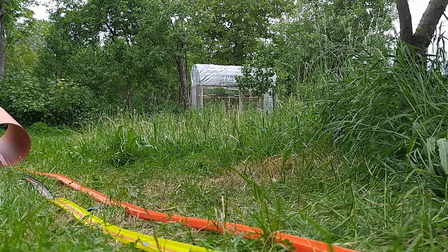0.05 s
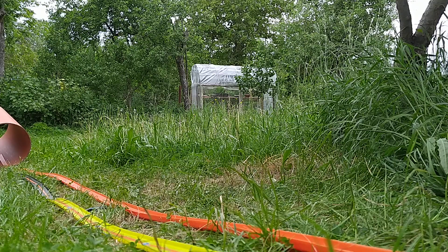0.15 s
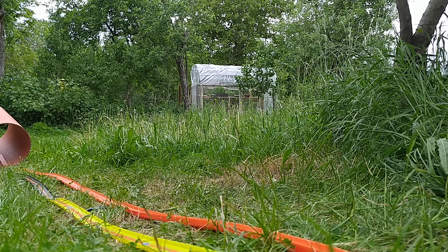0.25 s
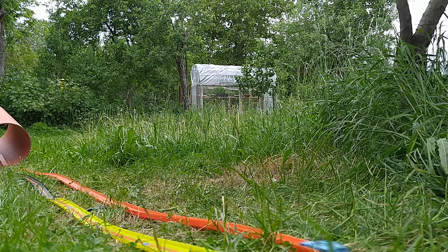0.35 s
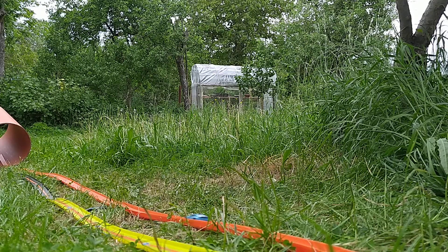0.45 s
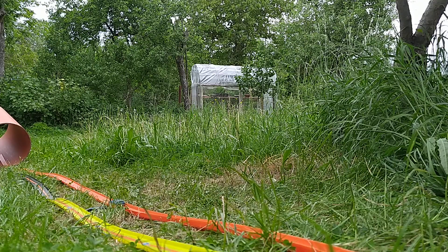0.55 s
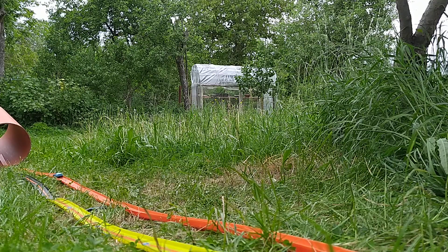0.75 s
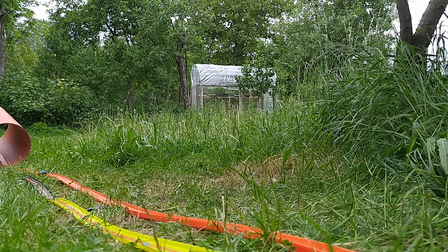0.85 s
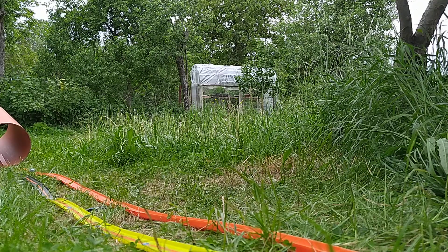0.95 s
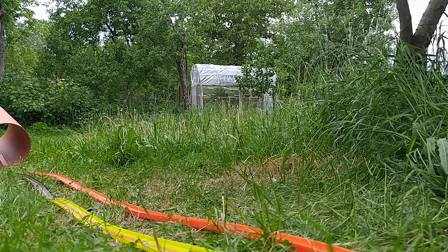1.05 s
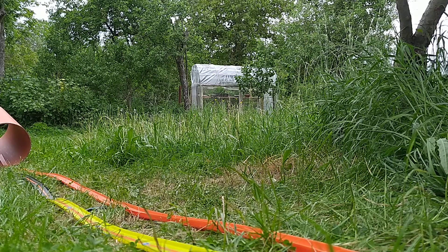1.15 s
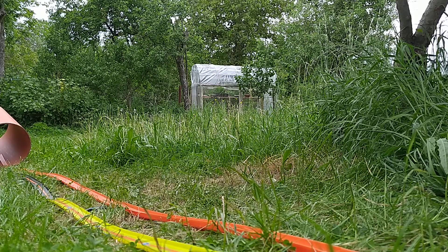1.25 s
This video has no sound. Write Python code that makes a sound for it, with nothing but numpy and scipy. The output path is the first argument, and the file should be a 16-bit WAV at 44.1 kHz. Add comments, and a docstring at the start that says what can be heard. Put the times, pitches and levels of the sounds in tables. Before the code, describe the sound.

A small toy car races by on a plastic track in a quiet garden. Light clicks lead into a bright rolling hiss with sharp clacks and a brief puff of air on the microphone, then the hiss thins away.

```python
"""A few light clicks, then a bright rush of wheels: a toy car shoots close by on a plastic track.
Its hard wheels hiss and patter on the rough plastic, clack over the joints and set the strip ringing.
Its draught puffs on the microphone's left port, and the hiss thins as it runs off through the grass.
Behind it lie quiet garden air and the fading echo of one faint, far bird."""
import sys
import numpy as np
from scipy import signal
from scipy.fft import rfft, irfft, next_fast_len
from scipy.io import wavfile
from scipy.ndimage import map_coordinates

SR = 44100
rng = np.random.default_rng(int(sys.argv[2]) if len(sys.argv) > 2 else 0)


def to_wav(sig):
    """Store sig (one row per channel, or 1-D mono) as 16-bit WAV at the path in sys.argv[1].

    Samples outside -1..1 are clipped; the rate is SR.
    """
    pcm = np.clip(np.atleast_2d(sig), -1, 1) * 32767
    pcm = np.round(pcm).astype(np.int16)
    wavfile.write(sys.argv[1], SR, pcm.T)  # frames by channels


N = 57330

# Fader rides for the wheels' hiss and low rumble: time_s, level_db
HISS_RIDE = [(.09, -65), (.14, -51.5), (.175, -58.5), (.21, -36.5), (.25, -20.5), (.275, -19), (.3, -22.5),
             (.335, -21), (.395, -21.5), (.43, -26), (.5, -31), (.55, -30), (.58, -31.5), (.63, -35.5),
             (.67, -33), (.8, -37), (.94, -38), (.99, -40), (1.02, -40.5), (1.09, -41), (1.19, -46.5),
             (1.3, -47)]
RUMBLE_RIDE = [(.16, -71), (.2, -56), (.255, -39.5), (.31, -48.5), (.33, -54), (.37, -60), (.43, -45.5),
               (.46, -59), (.5, -65), (.58, -61.5), (.71, -59.5), (.8, -70), (1.0, -71), (1.3, -75)]
# EQ of the hiss close by, the hiss far off and the rumble: frequency_hz, gain_db
NEAR_HISS_EQ = [(500, -36), (1400, -53), (2800, -26), (3500, -12.5), (4200, -3), (5000, -3.5), (5900, -2.5),
                (7300, -3), (9200, 4), (10800, 1.5), (12500, -5), (14200, -18), (15600, -20)]
FAR_HISS_EQ = [(500, -38), (1150, -23), (1600, -35.5), (2300, -23), (2850, -14), (3400, -24.5), (4100, -13),
               (5000, -12.5), (5700, -6.5), (6600, -9), (7400, -11.5), (8400, -2.5), (9300, 3),
               (10200, -8.5), (11600, -3), (12600, -25), (14000, -14), (15600, -21)]
RUMBLE_EQ = [(30, 6), (130, -10.5), (280, 7), (700, 6), (1150, 8), (1900, 6), (2700, 1), (3500, -7),
             (6000, -82)]
def rolling_wheels():
    """One contact force drives the car's hiss, the strip's ring and a low rumble."""
    force, far = wheel_contact(), farness()
    hiss = (1 - far) * coloured(force, NEAR_HISS_EQ) + far * coloured(force, FAR_HISS_EQ)
    rumble = coloured(force, RUMBLE_EQ)
    return amp(curve(HISS_RIDE)) * hiss + strip_ring(force) + amp(curve(RUMBLE_RIDE)) * rumble


def wheel_contact(grains_per_s=2200, spread_db=3.5, grain_share=0.41, flutter_db=1.02):
    """Tiny impacts of hard wheels on rough plastic over smooth friction, fluttering as they wobble."""
    hits = (rng.random(N) < grains_per_s / SR) * rng.choice([-1, 1], N)
    grains = unit(hits * amp(spread_db * rng.standard_normal(N)))
    flutter = amp(flutter_db * wobble(knots_per_s=73))
    friction = rng.standard_normal(N)
    return unit(flutter * (np.sqrt(grain_share) * grains + np.sqrt(1 - grain_share) * friction))


# Wheel hits on joints and bumps: start_s, click_db, crack_db, knock_db
JOINT_HITS = [(.1192, -29, -50, -80), (.1239, -17, -32, -76), (.1254, -14, -28, -72),
              (.2237, -17, -36, -56), (.275, -13, -30, -44), (.2868, -5.5, -11, -34), (.2882, -8, -24, -22),
              (.3029, -11, -30, -46), (.3044, -6.5, -28, -44), (.3491, -9, -2, -19),
              (.3508, -8.5, -13, -18), (.3627, -2.5, -9, -34), (.3777, -14, -32, -34),
              (.4063, -16, -32, -44), (.4375, -20, -38, -40), (.4824, -33, -45, -41),
              (.5095, -25, -42, -43), (.5417, -25, -45, -42), (.659, -29, -46, -57), (.9, -29, -50, -66),
              (.985, -30, -50, -68)]
# EQ of the four layers of a clack: frequency_hz, gain_db
CLICK_EQ = [(400, -19), (1200, -37), (1850, -4), (3000, -22), (4300, 1.5), (5600, -5.5), (7500, 1.5),
            (9300, 7), (11000, 0.5), (13000, -8), (15600, -41)]
CRACK_EQ = [(300, -8.5), (1500, -9), (3000, 4), (6500, 4.5), (11000, -23), (14000, 5), (15800, -6)]
KNOCK_EQ = [(60, -32), (400, -11), (1100, 9), (1800, -2), (2800, 6.5), (3800, 5.5), (8000, -22)]
THUD_EQ = [(40, -35), (150, -13.5), (330, -0.5), (550, 1), (850, 2.5), (1150, -9.5), (1700, -23),
           (5000, -59)]
def joint_clacks(attack_s=0.00012, click_t60_s=0.008, crack_t60_s=0.003, knock_t60_s=0.02):
    """Each hit layers the car's bright click, a hard crack, the track's duller knock and a dry thud."""
    click, crack, knock, slap = np.zeros((4, N))
    for start_s, click_db, crack_db, knock_db in JOINT_HITS:
        age = np.maximum(clock() - start_s, 0)
        rise = 1 - np.exp(-age / attack_s)
        click += rise * amp(click_db - 60 * age / click_t60_s)
        crack += rise * amp(crack_db - 60 * age / crack_t60_s)
        knock += rise * amp(knock_db - 60 * age / knock_t60_s)
        slap[round(start_s * SR)] += amp(knock_db + 10)  # the strip thuds on the ground
    layers = [(click, CLICK_EQ), (crack, CRACK_EQ), (knock, KNOCK_EQ)]
    bursts = sum(struck(envelope * rng.choice([-1, 1], N), eq) for envelope, eq in layers)
    return bursts + struck(slap, THUD_EQ)


# Resonances of the plastic strip: pitch_hz, width_hz, gain_db
STRIP_MODES = [(2030, 114, -7), (2270, 300, 1), (2510, 280, 5), (2724, 740, 7.5), (2940, 160, 1)]
# Fader ride for its ring: time_s, level_db
RING_RIDE = [(.16, -72), (.205, -51), (.235, -40), (.3, -31.5), (.342, -38), (.358, -25), (.41, -27.5),
             (.46, -51), (.5, -35.5), (.53, -58), (.74, -52), (.88, -90), (1.3, -75)]
def strip_ring(force, sway_db=2, high_cut_hz=2907):
    """The wheels excite the strip's modes, which come and go as the car moves along it."""
    ring = np.zeros(N)
    for pitch_hz, width_hz, gain_db in STRIP_MODES:
        mode = filtered(force, lambda hz: 1j * hz * width_hz
                        / (pitch_hz ** 2 - hz ** 2 + 1j * hz * width_hz))
        ring += amp(gain_db + sway_db * wobble(knots_per_s=29.8)) * mode
    ring = filtered(ring, lambda hz: 1 / np.hypot(1, (hz / high_cut_hz) ** 20))
    return amp(curve(RING_RIDE)) * unit(ring)


# The car's direction, as a delay between the ports: time_s, left_lead_ms
PAN_PATH = [(.2, 0.34), (.38, 0.49), (.45, 0.41), (.51, 0.087), (.63, -0.084), (.9, -0.22), (1.3, -0.24)]
# Stereo tilt with the car alongside and far ahead: frequency_hz, left_minus_right_db
NEAR_TILT = [(200, 0.5), (550, 2.5), (2000, 0.5), (7500, 2), (9500, -4), (11000, 17), (12300, 11),
             (15500, 4)]
FAR_TILT = [(300, -2.5), (2500, -1.5), (6000, -3), (8300, -5), (9400, -12), (10700, -1.5), (11900, 3),
            (13000, 4), (15000, -3)]
def pass_by(car, scatter_from_hz=1300):
    """The car reaches the two ports with a moving delay, close echoes and a colour set by direction."""
    far, sides = farness(), np.array([[1], [-1]])
    shift = curve(PAN_PATH) * SR / 2000  # half the lead to each side, in samples
    direct = np.array([map_coordinates(car, [np.arange(N) + side * shift], order=5) for side in (1, -1)])
    echoes = reflections(direct)

    def perspective(tilt, scatter_db):
        # Long waves scatter little, so the echoes lose their lows.
        wet = lambda hz: amp(scatter_db) * hz / np.hypot(hz, scatter_from_hz)
        pan = lambda hz: np.sqrt(2 / (1 + amp(-sides * along(tilt, hz)) ** 2))
        shade = lambda hz: pan(hz) / np.hypot(1, wet(hz))
        return filtered(direct, shade) + filtered(echoes, lambda hz: wet(hz) * shade(hz))
    close = perspective(NEAR_TILT, scatter_db=-3.5)
    distant = perspective(FAR_TILT, scatter_db=1.5)
    return (1 - far) * close + far * distant


PASS_S = 0.61  # midpoint of the move from near to far
def farness(fade_s=0.087):
    """Crossfade from 0 with the car alongside to 1 once it runs off ahead."""
    return .5 + .5 * np.tanh((clock() - PASS_S) / fade_s)


def reflections(direct, stretch_s=0.07966, near_t60_s=0.012, far_t60_s=0.035):
    """Echoes off track walls and ground change with each stretch and last longer out in the grass."""
    age, echoes = np.arange(SR // 16) / SR, np.zeros((2, N))
    for k, noise in enumerate(rng.standard_normal((24, 2, len(age)))):
        window = np.cos(np.pi / 2 * np.clip(clock() / stretch_s - k, -1, 1))
        t60_s = near_t60_s if k * stretch_s < PASS_S else far_t60_s
        tail = noise * amp(-60 * age / t60_s)
        tail /= np.linalg.norm(tail, axis=1, keepdims=True)
        echoes += signal.oaconvolve(direct * window, tail, axes=1)[:, :N]
    return echoes


# Puffs of air from the car: start_s, strength_db
AIR_PUFFS = [(.293, -16), (0.373, -27)]
def draught(rise_s=0.0044, fall_s=0.0091, flap_hz=171, flap_depth=0.17, low_cut_hz=18):
    """The passing car's air tugs briefly at the left port and barely touches the right."""
    pressure = np.zeros(N)
    for start_s, strength_db in AIR_PUFFS:
        age = np.maximum(clock() - start_s, 0)
        envelope = (1 - np.exp(-age / rise_s)) * np.exp(-age / fall_s)
        flap = 1 + flap_depth * np.sin(2 * np.pi * flap_hz * age)
        pressure -= 2 * amp(strength_db) * envelope * flap
    return filtered(pressure, lambda hz: hz / np.hypot(hz, low_cut_hz)) * np.array([[1], [amp(-38)]])


# EQ of the garden bed: frequency_hz, gain_db
GARDEN_EQ = [(25, 11), (60, -6.5), (150, 4.5), (350, 1.5), (800, -12), (2000, -7.5), (3500, -7),
             (4500, -11), (8000, -68), (11000, -57), (15000, -37)]
def garden_air(air_db=-65, breeze_db=-57):
    """A soft bed of leaves and distant air, with a slow breeze rumbling on the ports."""
    air = coloured(rng.standard_normal((2, N)), GARDEN_EQ)
    breeze_eq = [(10, -7), (25, -36), (60, -24.5), (200, -64), (1000, -120)]
    breeze = coloured(rng.standard_normal((2, N)), breeze_eq)
    return amp(air_db) * air + amp(breeze_db) * breeze


def far_bird(pitch_hz=2790, width_hz=170, level_db=-62, fade_db_per_s=110):
    """The dying echo of a far bird's whistle, smeared into a narrow band of noise."""
    band = lambda hz: np.exp(-((hz - pitch_hz) / width_hz) ** 2)
    whistle = unit(filtered(rng.standard_normal((2, N)), band))
    return amp(level_db - fade_db_per_s * clock()) * whistle


def amp(db):
    """Gain of a level in dB."""
    return 10 ** (np.asarray(db) / 20)


def unit(x):
    """x scaled to rms 1."""
    return x / np.sqrt(np.mean(x ** 2) + 1e-20)


def along(points, hz):
    """(frequency_hz, value) points read on a log axis."""
    frequencies, values = np.transpose(points)
    return np.interp(np.log(hz + 1), np.log(frequencies + 1), values)


def clock():
    """Time of each sample in seconds."""
    return np.arange(N) / SR


def curve(points):
    """(time_s, value) points joined up, one value per sample."""
    return np.interp(clock(), *np.transpose(points))


def wobble(knots_per_s):
    """A smooth random curve."""
    return map_coordinates(rng.standard_normal(N // 8), [clock() * knots_per_s], mode="wrap")


def filtered(x, response):
    """x through a frequency response."""
    size = next_fast_len(N + SR // 4)
    return irfft(rfft(x, size) * response(np.fft.rfftfreq(size, 1 / SR)), size)[..., :N]


def coloured(x, eq):
    """x through an EQ, at rms 1."""
    return unit(filtered(x, lambda hz: amp(along(eq, hz))))


def struck(x, eq):
    """x through a body with this EQ, which rings only after each blow; white noise keeps its level."""
    size = 2 * next_fast_len(N)
    gain = unit(amp(along(eq, np.fft.rfftfreq(size, 1 / SR))))
    cepstrum = irfft(np.log(gain + 1e-6), size)
    cepstrum[1:size // 2] *= 2  # fold to minimum phase
    cepstrum[size // 2 + 1:] = 0
    return irfft(rfft(x, size) * np.exp(rfft(cepstrum)), size)[:N]


def scene():
    """The car and its draught up front, the garden behind."""
    car = rolling_wheels() + joint_clacks()
    return pass_by(car) + draught() + garden_air() + far_bird()


def record(dry):
    """A soft clip rounds off the highest peaks, then a steep high cut trims the top."""
    ceiling, high_cut_hz = 0.85, 15900
    rounded = dry / (1 + (dry / ceiling) ** 8) ** (1 / 8)
    return filtered(rounded, lambda hz: hz < high_cut_hz)


dry = scene()
out = record(dry)
to_wav(out)
```